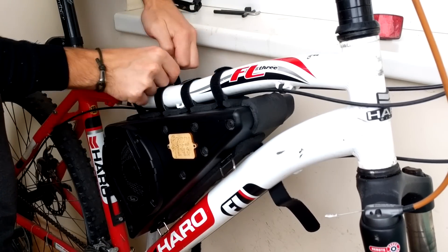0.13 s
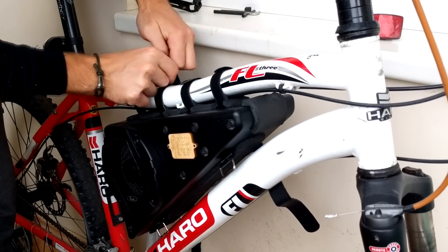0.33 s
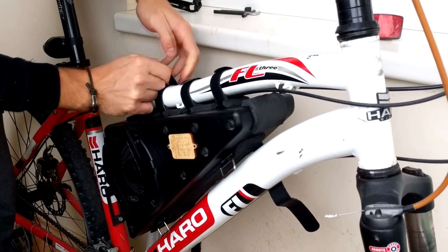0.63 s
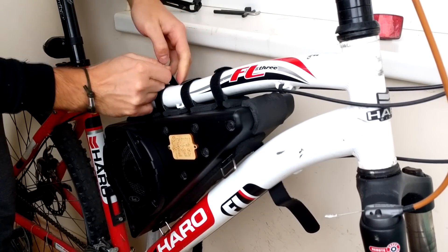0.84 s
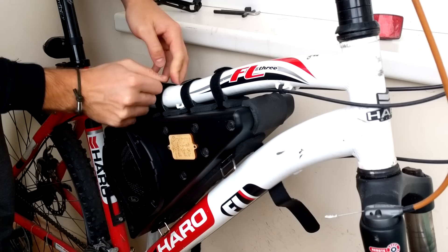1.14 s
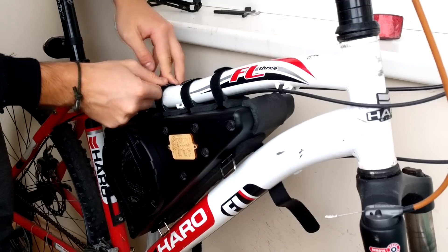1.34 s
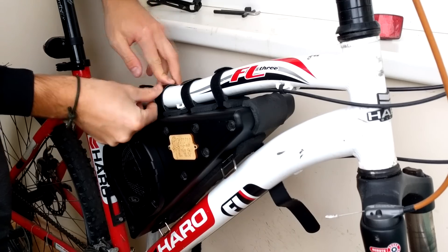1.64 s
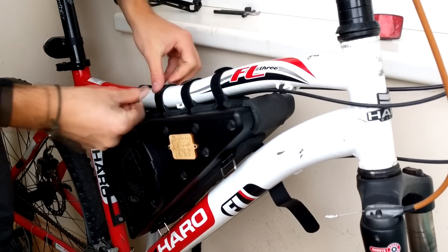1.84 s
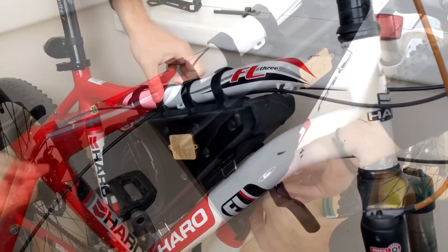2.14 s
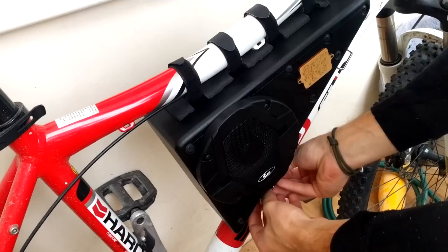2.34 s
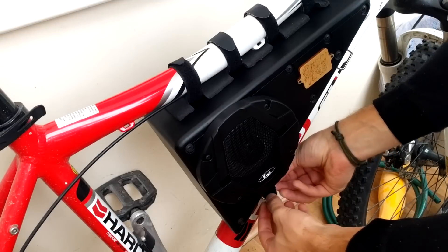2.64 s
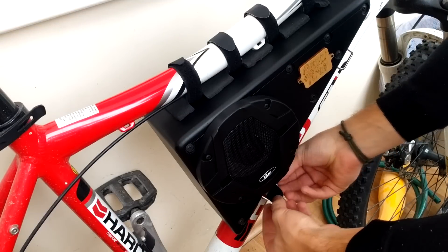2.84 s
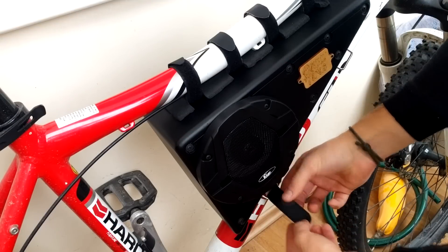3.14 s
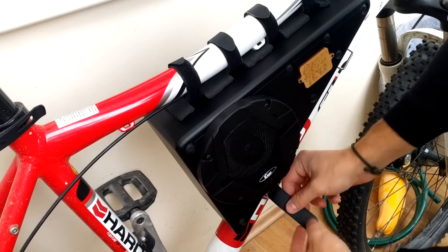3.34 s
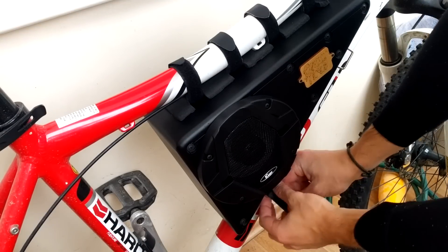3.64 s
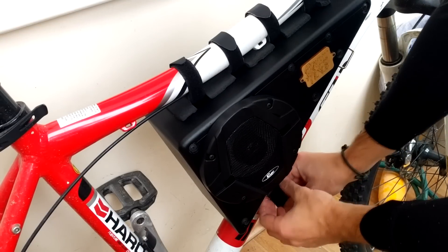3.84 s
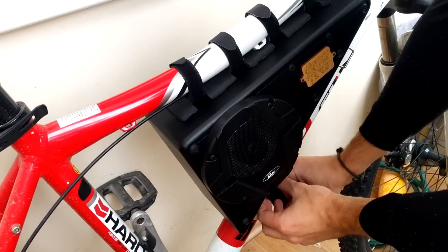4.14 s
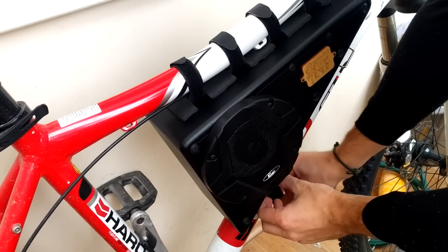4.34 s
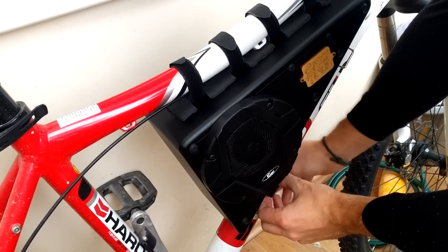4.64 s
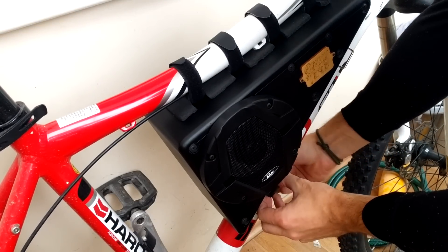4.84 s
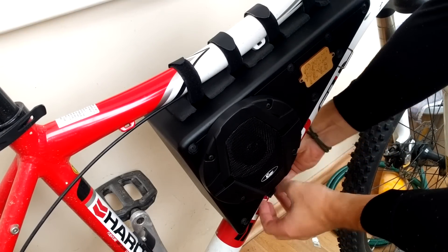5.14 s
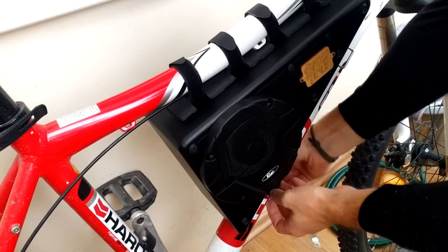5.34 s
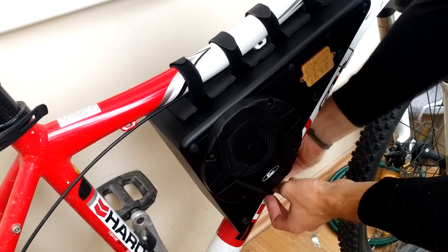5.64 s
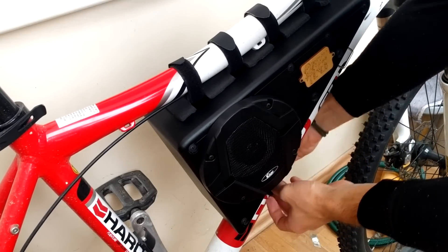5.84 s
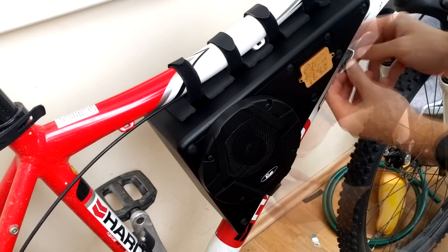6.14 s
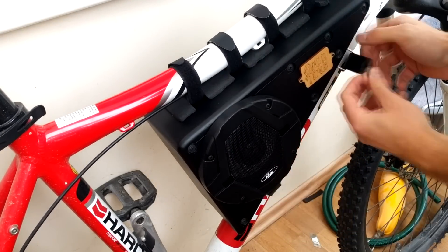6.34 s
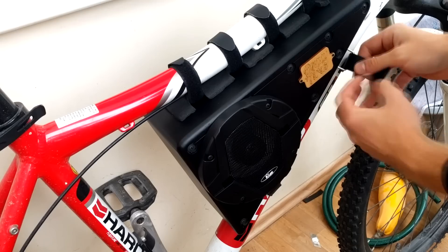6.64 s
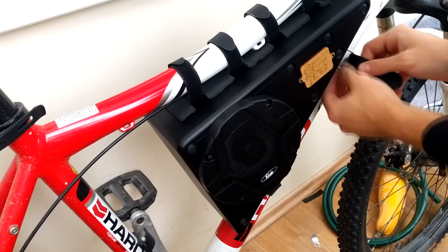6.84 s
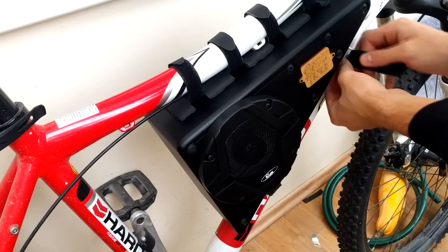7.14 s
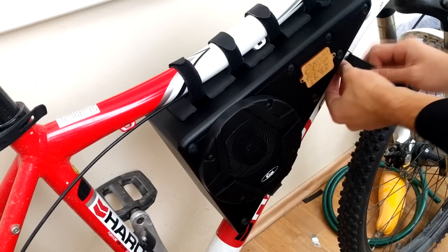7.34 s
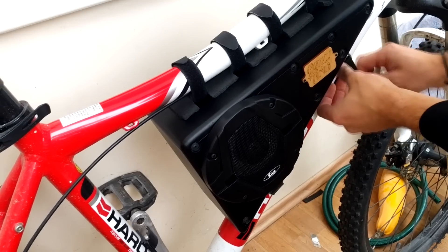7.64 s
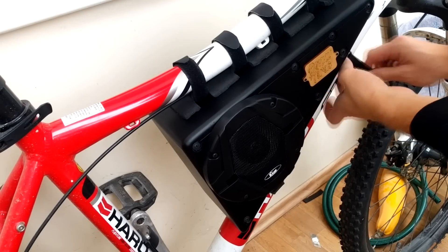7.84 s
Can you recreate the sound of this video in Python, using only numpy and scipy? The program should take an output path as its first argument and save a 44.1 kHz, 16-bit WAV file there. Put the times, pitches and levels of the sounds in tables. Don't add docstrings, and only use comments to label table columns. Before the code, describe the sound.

Brittle, high crackles of fabric fastener straps come in uneven bursts, with fingers rasping between them. After a light start and a lull, tugging brings sharper rips, a hollow plastic knock and a dull frame bump. The busiest bursts peak after five seconds, then scattered snaps and tight twangs continue and thin out. Close microphone, small hard-walled room, low mains hum and soft hiss throughout.

```python
import sys
import numpy as np
from scipy import signal
from scipy.fft import rfft, irfft
from scipy.io import wavfile
from scipy.ndimage import uniform_filter1d

SR = 44100
rng = np.random.default_rng(int(sys.argv[2]) if len(sys.argv) > 2 else 0)


def voltage_ratio(level):
    return 10 ** (np.asarray(level, float) / 20)


def store_wav(level_fs):
    pcm = np.round(np.clip(np.atleast_2d(level_fs), -1, 1) * 32767)
    wavfile.write(sys.argv[1], SR, pcm.T.astype(np.int16))


N = 352359


def rms_one(x):
    return x / np.sqrt(np.mean(x ** 2) + 1e-20)


def at_hz(points, hz):
    table = np.array(points)
    return np.interp(np.log(hz), np.log(table[:, 0]), table[:, 1])


def colour(x, points):
    hz = np.maximum(np.fft.rfftfreq(2048, 1 / SR), 10)
    fold = irfft(np.log(voltage_ratio(np.maximum(at_hz(points, hz), -90))))
    fold[1:1024] *= 2
    fold[1025:] = 0
    return signal.oaconvolve(x, irfft(np.exp(rfft(fold))))[:len(x)]


def resonance(x, hz, width_hz):
    r = np.exp(-np.pi * width_hz / SR)
    w = 2 * np.pi * min(hz, 18000) / SR
    return signal.lfilter([(1 - r * r) / 2, 0, (r * r - 1) / 2], [1, -2 * r * np.cos(w), r * r], x + 1e-18)


def band(x, low_hz, high_hz):
    return signal.sosfilt(signal.butter(3, [low_hz, high_hz], "band", fs=SR, output="sos"), x + 1e-18)


def hooks(size, per_s, spread_db):
    when, how_big, sign = rng.random((size, 3)).T
    sizes = voltage_ratio(spread_db * np.minimum(-np.log(how_big + 1e-9), 4))
    return (when < per_s / SR) * sizes * np.sign(sign - .5)


def clusters(rows, sharpness, broad_db, level_db, strain_db=-14.5, low_share=0.36):
    lead = 500
    out = np.zeros(N + 6000)
    t = np.arange(1 - lead, 6001 - lead) / SR
    after = np.maximum(t, 0)
    for start_s, db, hz, length_s, *flap_db in rows:
        tau = np.clip(0.47 * (length_s - .001), 1.2e-4, .02)
        strain = voltage_ratio(strain_db) * np.exp(-np.abs(t) / 0.002) * min(length_s / 0.024, 1)
        rise = 1 - np.exp(-after / (0.54 * tau))
        fade = np.exp(-after / (1.61 * tau))
        grains = hooks(size=len(t), per_s=16000, spread_db=3.2) * (.5 * rise * fade + strain)
        grains[lead + 2] += 1.53 / 2

        burst = rfft(grains)
        ripple = uniform_filter1d(np.abs(burst) ** 2, size=45, mode="mirror") + 1e-12
        even = irfft(burst / ripple ** .27)
        even[len(t) // 2:] = 0

        rung = resonance(even, hz, hz / sharpness) + voltage_ratio(broad_db) * even
        no_lows = signal.butter(3, min(low_share * hz, 12000), "high", fs=SR)
        rung = rms_one(signal.lfilter(*no_lows, rung))
        for share_db in flap_db:
            rung += voltage_ratio(share_db + 0.5) * rms_one(band(even, 1150, 3710))
        at = round(start_s * SR) - lead
        out[at:at + len(t)] += voltage_ratio(db + level_db) * rung * np.sqrt(max(length_s, .001) * SR / len(t))
    return out[:N]


# start_s, level_db (peak), pitch_hz, length_s
TOP_STRAP = [(.4685, -47, 13100, 0.0022), (.4983, -42.5, 6560, 0.024), (.6586, -36.5, 6600, 0.0016),
             (.6787, -42, 7540, 0.0038), (.6998, -26, 7300, 0.0029), (.7602, -45, 10100, .0034),
             (.9502, -30, 8250, 0.0018), (1.0522, -42, 11300, 0.015), (1.0733, -40, 6760, 0.01),
             (1.152, -38, 7600, 0.0012), (1.2771, -45.5, 10900, 0.00087), (1.3917, -47, 8100, 0.0011),
             (1.476, -39.5, 9250, 0.0075), (1.7437, -48, 10100, 0.007), (1.87, -45, 13400, 0.0039),
             (2.1401, -49.5, 8740, 0.018), (2.2124, -56, 5600, 0.068), (2.2449, -73, 5400, 0.032)]
LOW_STRAP_OPENED = [(2.4106, -44, 2010, 0.0018), (2.4454, -46, 6600, .0011), (2.5814, -46, 12300, 0.0051),
                    (2.6465, -48, 4000, 0.0038), (2.7506, -47, 9000, 0.0027), (2.757, -38.5, 10200, 0.0058),
                    (2.8717, -46, 8350, 0.0011), (2.916, -33, 14800, 0.0057), (2.9037, -47, 13100, 0.005),
                    (2.9329, -33, 9500, 0.0075), (3.189, -41, 9900, 0.0011), (3.206, -29, 9000, 0.0021),
                    (3.2261, -32.5, 7500, 0.0039), (3.2724, -35, 7550, 0.0031),
                    (3.2909, -32.5, 6260, 0.0045), (3.3975, -44.5, 8750, 0.0098),
                    (3.4523, -37, 9200, .00073), (3.527, -35.5, 3700, 0.0038),
                    (3.6996, -26.5, 4280, 0.0029), (3.7567, -30.5, 10800, 0.0014),
                    (3.885, -38.5, 8550, 0.0021), (3.9899, -36, 10100, 0.001), (4.0833, -44.5, 4430, 0.011),
                    (4.089, -47, 11800, 0.027), (4.7461, -58, 10700, 0.012)]
LOW_STRAP_SHUT = [(4.8637, -40.5, 6760, 0.0094), (4.9576, -38, 8000, 0.0063), (4.987, -38, 9900, 0.002),
                  (5.036, -40.5, 9600, 0.0042), (5.112, -40, 11500, 0.0021), (5.1323, -36, 11000, 0.016),
                  (5.2434, -46, 9700, 0.022), (5.2824, -32.5, 10200, 0.0059), (5.3426, -34, 11400, 0.0024),
                  (5.3606, -18, 7400, 0.0033), (5.4348, -26, 9400, 0.0046), (5.4434, -29.5, 5760, 0.017),
                  (5.504, -29, 8500, 0.0053), (5.5394, -24, 6940, 0.0099), (5.546, -31, 8700, 0.014),
                  (5.6945, -35.5, 5100, 0.0049), (5.7373, -37, 4300, 0.002), (5.7603, -34, 5800, 0.0036),
                  (5.7706, -34, 4500, 0.0027), (5.8052, -33.5, 3630, 0.0043), (5.8823, -44.5, 5060, 0.009),
                  (5.9512, -48, 5470, 0.022)]
FRONT_STRAP = [(6.0269, -32, 4960, 0.0026), (6.089, -45.5, 6740, 0.0049), (6.1288, -34.5, 9600, 0.0057),
               (6.1546, -29, 4670, 0.0022), (6.183, -34, 6000, 0.0096), (6.2549, -35.5, 6200, 0.016),
               (6.3108, -36.5, 9200, 0.0018), (6.3558, -30.5, 8200, 0.0027), (6.366, -37, 7500, 0.013),
               (6.405, -35, 7800, 0.0042), (6.4176, -34, 7240, 0.0034), (6.4711, -35.5, 8000, 0.0057),
               (6.4746, -25, 8500, 0.0031), (6.57, -32, 8100, 0.0049), (6.572, -30, 10700, 0.004),
               (6.71, -29, 8800, 0.0023), (6.747, -39.5, 7400, 0.0084), (6.854, -51, 9100, 0.0033),
               (6.8954, -33.5, 7400, 0.0074), (6.9014, -28, 10500, 0.0027), (6.936, -36.5, 10400, 0.0034),
               (7.005, -39, 9100, 0.0019), (7.033, -30, 9500, 0.00015), (7.0675, -40.5, 7750, 0.0021),
               (7.281, -40, 8050, .0007), (7.2987, -54, 8500, 0.0017), (7.4214, -49, 10200, 0.0018),
               (7.0976, -43, 9000, 0.0019), (7.4603, -45, 8300, 0.001), (7.589, -43, 8250, 0.011),
               (7.6754, -38, 3350, 0.0023)]
# start_s, level_db (peak), pitch_hz, length_s
PEELED = [(0.767, -31, 7300.0, 0.0022), (0.787, -34, 13200.0, 0.0018), (0.801, -34.5, 7400, 0.0023),
          (0.821, -34.5, 12800.0, 0.0025), (0.8309, -30, 5400, 0.0014), (0.846, -33.5, 8000.0, 0.0017),
          (0.897, -37, 13800.0, 0.0025), (0.91, -41, 8100.0, 0.0022), (0.9217, -38.5, 7900.0, 0.0023),
          (0.936, -37, 15000.0, 0.002), (2.967, -34.0, 9600, 0.0037), (2.998, -36.0, 13500.0, 0.0025),
          (3.002, -34.0, 12400.0, 0.0025), (3.031, -35, 12700.0, 0.0061), (3.044, -32, 11000.0, 0.0014),
          (3.046, -34, 9600, 0.0021), (3.062, -35.5, 9800, 0.0031), (3.0871, -30.0, 12600, 0.0029),
          (3.1088, -31.5, 10900.0, 0.0031), (3.112, -36, 8200.0, 0.0023), (3.144, -38, 9200.0, 0.005),
          (3.158, -35, 9000.0, 0.0033), (3.16, -41, 9700.0, 0.0029), (3.171, -29.5, 9900.0, 0.0021),
          (3.181, -41, 9500, 0.0029), (4.224, -35, 13400, 0.003), (4.243, -43, 6000.0, 0.0031),
          (4.266, -39, 11800.0, 0.0019), (4.289, -44.5, 6000.0, 0.0029), (4.29, -40, 13500.0, 0.0025),
          (5.3956, -22.5, 7500, 0.0022), (5.4053, -30, 7100, 0.007), (5.4123, -30, 7950, 0.0095),
          (5.463, -29, 5900.0, 0.0035), (7.176, -33.0, 4700.0, 0.002), (7.192, -32, 7700.0, 0.0023),
          (7.2065, -31, 7800.0, 0.0018), (7.2228, -34.5, 8040, 0.0028), (7.2255, -34.0, 11900.0, 0.0027),
          (7.3225, -36.5, 7500.0, 0.0024), (7.333, -44, 13300.0, 0.0027), (7.3399, -41, 8100.0, 0.0027),
          (7.3526, -33.5, 7700.0, 0.0025)]
FLAP_DB = [
    -14.5,
    -11.5,
    -11,
    -10.5,
    -12,
]


def strap_bursts():
    straps = TOP_STRAP, LOW_STRAP_OPENED, LOW_STRAP_SHUT, FRONT_STRAP, PEELED
    rows = []
    for strap, strap_flap_db in zip(straps, FLAP_DB):
        for start_s, db, hz, length_s in strap:
            octaves_up = max(np.log2(hz / 8000), -.5)
            doublings = np.log2(length_s / 0.0042)
            rows.append((start_s, db, hz, length_s, strap_flap_db - 4.5 * octaves_up + 2 * doublings))
    return clusters(rows, sharpness=2.8, broad_db=-3.5, level_db=-6.5, low_share=0.51)


# start_s, level_db (peak), pitch_hz
TICKS = [(0.2081, -57.0, 12700.0), (0.2913, -52, 11400.0), (0.6531, -47, 5900.0), (0.6714, -46.0, 12300.0),
         (0.9859, -33, 13800.0), (1.0023, -44, 8260), (1.0589, -40, 11900.0), (1.0789, -46, 7400.0),
         (1.2582, -48, 12000.0), (1.3262, -52, 8000.0), (1.3335, -53, 10900.0), (1.4251, -50, 10000.0),
         (2.9241, -30, 9400.0), (2.9298, -33, 10900), (2.9348, -32.0, 11600.0), (3.1928, -28, 6200),
         (3.2295, -25, 7800), (3.5116, -50, 9900.0), (3.5232, -45.0, 14600.0), (3.6249, -50, 10400.0),
         (3.665, -52.0, 14600.0), (3.6681, -49.0, 10200.0), (3.6804, -54.0, 12100.0),
         (3.7413, -35, 10900.0), (4.0896, -52, 12100.0), (4.7221, -40.5, 10000), (4.7446, -36, 10300.0),
         (5.1334, -32, 9600.0), (5.1399, -30.0, 8900.0), (5.1518, -46, 8700.0), (5.1704, -45, 8800.0),
         (5.7187, -45, 5900.0), (5.7606, -47, 5900.0), (5.8842, -46, 5300.0), (6.1594, -39, 12100.0),
         (6.3639, -37, 5600.0), (6.3658, -34.0, 9430), (6.3727, -32.5, 6300), (6.38, -42, 9900.0),
         (6.4002, -37, 11900), (6.4272, -36.5, 5500), (6.4973, -37, 7100.0), (6.5185, -36, 6800.0),
         (6.5381, -45, 8700.0), (6.5723, -22.5, 8400.0), (6.611, -46, 8300.0), (6.8694, -53, 10500.0),
         (6.8728, -52.0, 12300.0), (6.9039, -26.5, 10800), (7.0085, -36.5, 9000.0), (7.0737, -40.5, 7300.0),
         (7.2551, -44, 15000.0), (7.3119, -48, 4000.0), (7.5923, -45, 9700), (7.6931, -44.5, 7900.0)]


def lone_hooks():
    tick_s = 0.0018
    rows = [(start_s, db, hz, tick_s) for start_s, db, hz in TICKS]
    return clusters(rows, sharpness=3.5, broad_db=-14, level_db=-7.0, low_share=0.57)


# start_s, level_db (peak), pitch_hz, length_s
TWANGS = [(.699, -40, 7600, 0.0084), (3.0605, -31, 10000, .005), (3.157, -32.5, 8700, 0.0085),
          (3.187, -29.5, 9600, 0.0071), (4.863, -39, 5760, 0.0063), (5.131, -32, 9900, 0.0089),
          (5.2826, -30.5, 4340, 0.0026), (5.2828, -33, 6940, 0.0027), (5.547, -24.5, 10300, 0.0086),
          (5.548, -29, 5600, 0.0096), (6.256, -38, 6300, 0.0071), (6.474, -37, 9600, 0.0043),
          (6.478, -38, 7040, 0.0094), (6.571, -30.5, 7860, 0.0066), (6.898, -34, 5600, .006),
          (6.899, -38, 3200, 0.0045), (6.905, -48.5, 5400, 0.05)]


def twangs():
    return clusters(TWANGS, sharpness=11.0, broad_db=-14.5, level_db=-7.0, low_share=0.65)


# start_s, held_s, level_db (rasp), brightest_hz, case_db (share of the case)
RUBS = [(.12, 0.01, -55, 8000, -26), (.45, 0.084, -47.5, 6300, -36), (.97, 0.15, -37, 9300, -35.5),
        (1.5, 0.071, -49.5, 9150, -22.5), (1.87, .28, -54, 7500, -21.5), (2.35, 0.029, -62, 8600, -21),
        (2.58, 0.02, -48.5, 8900, -29), (2.92, .42, -41.5, 8800, -24), (3.52, 0.015, -46, 6200, -32),
        (3.73, 0.028, -55.5, 4660, 6), (3.8, .3, -56, 7900, -20), (4.13, 0.0081, -55, 5800, -23),
        (4.4, .4, -46, 9500, -30.5), (4.9, 0.067, -40, 8000, -30), (5.155, 0.0069, -26, 7500, -32.5),
        (5.42, 0.035, -36, 6800, -13.5), (5.555, 0.061, -28.5, 6400, -34), (5.64, 0.076, -37.5, 5300, -36),
        (5.76, 0.087, -48.5, 5900, -19), (5.93, .37, -54, 6100, -16.5), (6.43, 0.23, -40, 8300, -22.5),
        (6.95, 0.13, -50, 8700, -21.5), (7.3, .3, -42.5, 8600, -26.5), (7.66, 0.27, -55, 7300, -11.5)]
# time_s, level_db (rasp)
REST = [
    (0, -80),
    (.3, -86),
    (.7, -48.5),
    (1.3, -67),
    (2.4, -71),
    (4.2, -57),
    (6, -48),
    (6.83, -109),
    (7.99, -53),
]


def rubbing():
    t = np.arange(0, N + 64, 64) / SR
    start_s, held_s, db, hz, case_db = np.array(RUBS).T[:, :, None]
    rise_db = 280 * np.maximum(start_s - t, 0)
    fall_db = 265 * np.maximum(t - start_s - held_s, 0)
    rest = voltage_ratio(np.interp(t, *np.transpose(REST))) ** 2 / len(RUBS)
    power = voltage_ratio(db - rise_db - fall_db) ** 2 + rest
    total = power.sum(axis=0)
    brightest_hz = (power * hz).sum(axis=0) / total
    case_share_db = (power * case_db).sum(axis=0) / total
    curves = 10 * np.log10(total), brightest_hz, case_share_db
    return [np.interp(np.arange(N) / SR, t, curve) for curve in curves]


def rasp():
    db, brightest_hz, case_db = rubbing()
    lumps = uniform_filter1d(hooks(size=N, per_s=180, spread_db=2.0) ** 2, size=70)
    grains = hooks(size=N, per_s=14000, spread_db=2.5) * np.sqrt(1 + 2.5 * rms_one(lumps))
    dealt = rng.integers(0, 8, N)
    out = np.zeros(N)
    for k, hz in enumerate(np.geomspace(2500, 15000, 8)):
        near = voltage_ratio(-6.0 * np.log2(hz / brightest_hz) ** 2)
        out += resonance(grains * near * (dealt == k), hz, 1.1 * hz)
    rub = voltage_ratio(db - 17.5) * rms_one(out)
    drag = voltage_ratio(db + case_db) * rms_one(grains)
    return rub, drag


# start_s, level_db (peak), pitch_hz, length_s
BRUSHES = [
    (0.0875, -63.5, 6500, 0.041),
    (1.46, -57.5, 8800, 0.026),
    (1.841, -65.5, 8420, 0.047),
    (2.074, -60, 8000, 0.055),
    (4.373, -64, 8800, 0.059),
    (4.462, -60.5, 4480, 0.046),
    (4.608, -57.5, 10000, 0.05),
    (7.935, -63, 12900, 0.013),
]


def brushes():
    return clusters(BRUSHES, sharpness=4.7, broad_db=1, level_db=1.5)


# pitch_hz, level_db
STRAP = [(530, -52), (900, -3), (1460, -11), (2300, -3.5), (3470, -2.5), (5610, -2), (9880, -2),
         (12400, -1), (16000, -12)]
# pitch_hz, width_hz, level_db
FRAME = [
    (2060, 39, -0.5),
    (3230, 42, -15),
    (5600, 150, -15),
]


def strap_on_frame(contacts):
    strap = colour(contacts, STRAP[:-1]) * voltage_ratio(-1)
    return strap + sum(voltage_ratio(db) * resonance(strap, hz, width_hz) for hz, width_hz, db in FRAME)


# pitch_hz, level_db, decay_s (time to fall 60 dB)
CASE = [(418, -9, 0.18), (470, -17, 0.17), (603, -6.5, 0.037), (741, 2, 0.15), (899, -9.5, 0.19),
        (1007, -3, 0.19), (1144, -11, 0.15), (1210, -16, 0.12), (1370, -6, 0.2), (1998, -12, 0.2),
        (2320, -17, 0.23), (2620, -14, 0.12), (2800, 0, 0.2), (3040, -9, 0.17)]


def case_ring(x):
    out = np.zeros(N)
    for k, (hz, db, decay_s) in enumerate(CASE):
        width_hz = 1.5 / np.clip(0.29 * decay_s, .01, .045)
        out += (-1) ** k * voltage_ratio(db - 3.5) * resonance(x, hz, width_hz) * np.sqrt(100 / width_hz)
    return out


# start_s, level_db (peak), pitch_hz, length_s (contact)
KNOCKS = [(0.701, -54, 1330, 0.0073), (1.066, -60, 970, 0.005), (1.476, -61.5, 497, 0.016),
          (2.072, -66.5, 1370, 0.034), (2.314, -62, 300, 0.0027), (2.914, -58, 2320, 0.0021),
          (3.142, -51, 440, 0.0039), (3.189, -44, 1320, 0.00098), (3.226, -44, 1360, 0.0011),
          (3.291, -53, 2100, 0.00086), (3.397, -61, 1560, 0.0091), (3.527, -44, 1320, 0.0025),
          (3.527, -49.5, 730, 0.0036), (3.6995, -31.5, 690, 0.0021), (3.6998, -49, 1350, 0.0026),
          (3.7055, -36.5, 740, 0.0019), (3.7125, -38, 650, 0.0021), (3.7005, -41, 2800, 0.0041),
          (4.08, -60, 910, 0.0052), (4.105, -55.5, 450, 0.008), (4.863, -50.5, 1050, 0.0053),
          (4.872, -52, 1150, 0.0075), (5.167, -57.5, 570, 0.0037), (5.36, -37, 800, 0.0013),
          (5.541, -48.5, 736, 0.0082), (4.62, -69, 1960, 0.038), (7.2, -57, 378, 0.01),
          (.505, -69, 1040, 0.012), (6.128, -49.5, 1130, 0.0026), (6.182, -48.5, 1695, 0.0032),
          (6.258, -47, 1460, 0.0032), (6.474, -54, 624, 0.0041), (6.571, -46, 2320, 0.0014),
          (6.898, -48, 2500, 0.0023), (7.191, -51, 1450, 0.0019), (7.224, -48, 1500, 0.0019),
          (7.355, -51.5, 610, 0.0011), (7.389, -47, 384, 0.0016), (7.589, -59.5, 910, 0.0081)]


def plastic_case(drag):
    knocks = band(clusters(KNOCKS, sharpness=2.9, broad_db=-15, level_db=1.0), 200, 3700)
    ring = case_ring(knocks + voltage_ratio(2.5) * band(drag, 1170, 6000))
    return voltage_ratio(-2.0) * knocks + ring + voltage_ratio(6.0) * band(drag, 325, 2300)


# start_s, level_db (peak), pitch_hz, length_s (contact)
BUMPS = [(2.186, -64.5, 90.5, 0.038), (2.319, -56, 143.5, 0.011), (3.138, -60, 180, 0.012),
         (3.704, -46, 343, 0.0091), (6.195, -63, 370, 0.0086), (6.478, -55, 350, 0.0081),
         (6.24, -61.5, 69.5, 0.049), (6.35, -58, 75, 0.035), (7.385, -74, 326, 0.01),
         (3.528, -66, 396, 0.01), (5.757, -81, 198, 0.041), (6.315, -56.5, 75.5, 0.017),
         (6.719, -89, 80.7, 0.038)]


def frame_bumps():
    return band(clusters(BUMPS, sharpness=4.5, broad_db=-19.0, level_db=4.5), 30, 470)


# pitch_hz, decay_s (time to fall 60 dB)
ROOM = [(300, 0.28), (1000, 0.32), (3000, 0.36), (8000, 0.29), (15000, 0.17)]
# delay_s, level_db
ECHOES = [
    (.0064, -45),
    (0.011, -63),
    (0.019, -35),
]


def answer():
    t = np.arange(SR * 2 // 5) / SR
    edges_hz = np.geomspace(60, 18000, 13)
    tail = np.zeros(len(t))
    for low, high in zip(edges_hz, edges_hz[1:]):
        sos = signal.butter(2, [low, high], "band", fs=SR, output="sos")
        noise = signal.sosfilt(sos, rng.standard_normal(len(t)))
        tail += noise * voltage_ratio(-60 * t / at_hz(ROOM, np.sqrt(low * high)))
    crowding = 1 + voltage_ratio(-1.5) * np.exp(-t / 0.002)
    tail *= (1 - np.exp(-t / 0.0004)) * crowding
    tail *= voltage_ratio(-0.5) / np.sqrt(np.sum(tail ** 2))
    for (delay_s, db), shift in zip(ECHOES, rng.uniform(1.0, 1.03, len(ECHOES))):
        tail[round(delay_s * shift * SR)] -= voltage_ratio(db)
    return tail


def room(x, count=6):
    turn = np.arange(N) / SR / .11
    out = x.copy()
    for k in range(count):
        distance = np.abs((turn - k + count / 2) % count - count / 2)
        share = np.clip(1 - distance, 0, 1)
        out += signal.oaconvolve(x * np.sqrt(share), answer())[:N]
    return out


# pitch_hz, level_db
HISS = [(15, -27), (25, -17), (64, -3), (206, -10.5), (229, -14), (301, -13), (326, -10.5), (545, -18),
        (1040, -22), (1230, -22), (5570, -25.5), (12200, -19.5), (16000, -21.5)]
# pitch_hz, level_db (rms)
HUM = [
    (50, -83.5),
    (101, -88.5),
    (150, -84.5),
    (202, -83.5),
    (301, -83),
]


def background():
    out = voltage_ratio(-67.5) * rms_one(colour(rng.standard_normal(N), HISS))
    for hz, db in HUM:
        wavering = resonance(resonance(rng.standard_normal(N), hz, 9.0), hz, 9.1)
        out += voltage_ratio(db) * rms_one(wavering)
    return out


def scene():
    rub, drag = rasp()
    snaps = strap_bursts() + lone_hooks() + twangs()
    strap = strap_on_frame(snaps + brushes() + rub)
    hands_at_work = strap + plastic_case(drag) + frame_bumps()
    return (room(hands_at_work) + background())[None]


def low_pass(x):
    return signal.sosfilt(signal.butter(12, 16640, fs=SR, output="sos"), x)


def record(dry):
    top = signal.ellip(10, .5, 50, 15780, fs=SR, output="sos")
    mix = signal.sosfilt(top, dry)
    return low_pass(mix)


dry = scene()
out = record(dry)
store_wav(out)
```